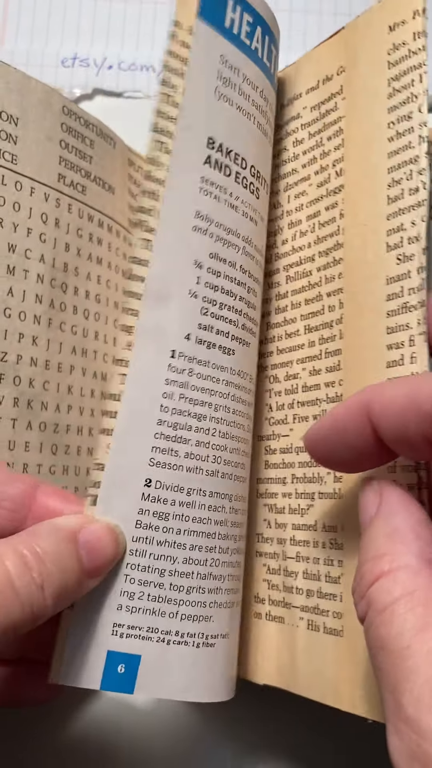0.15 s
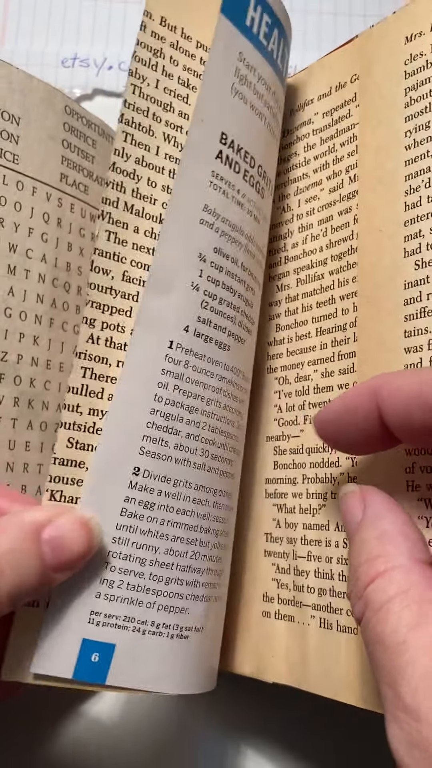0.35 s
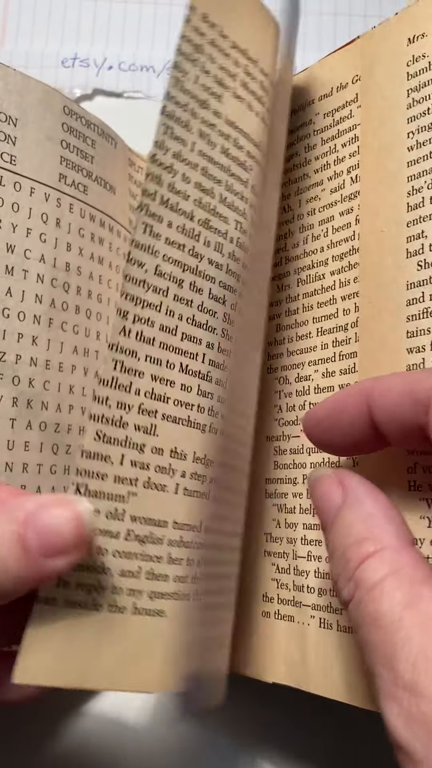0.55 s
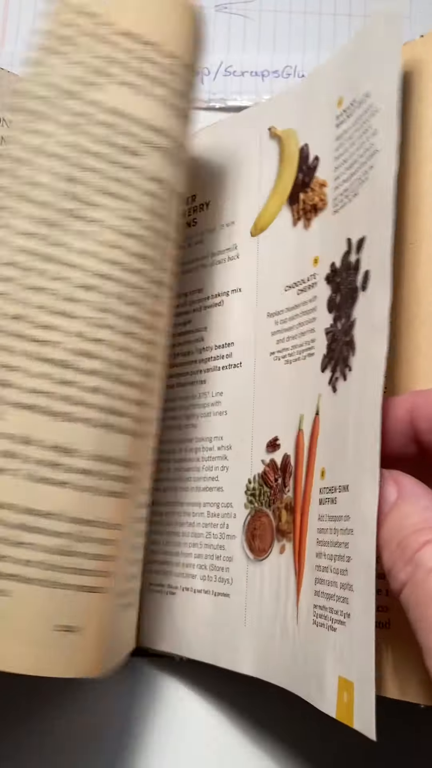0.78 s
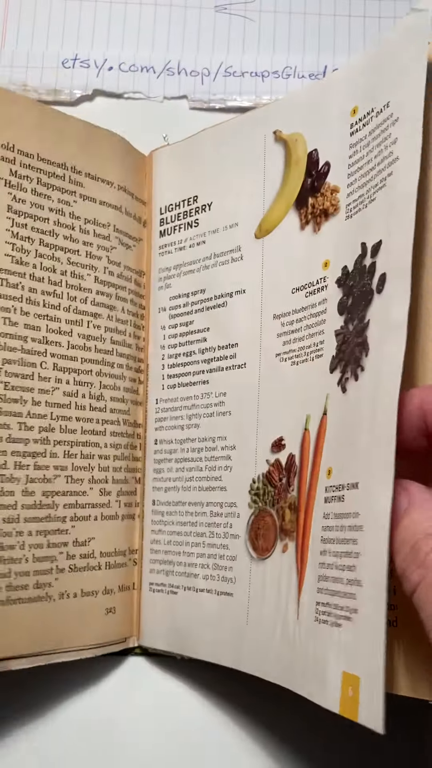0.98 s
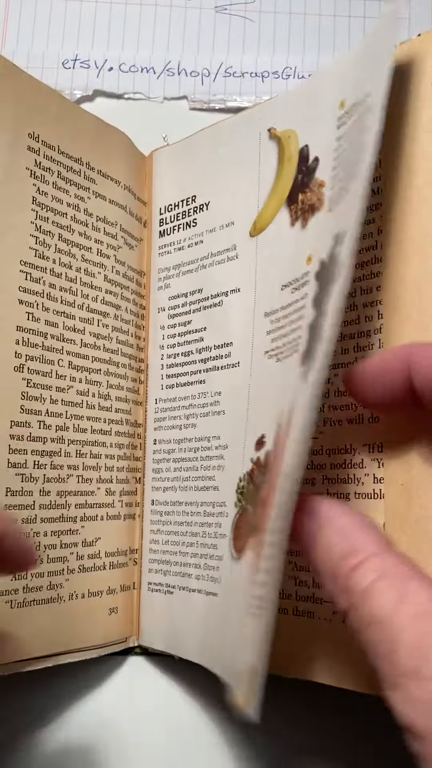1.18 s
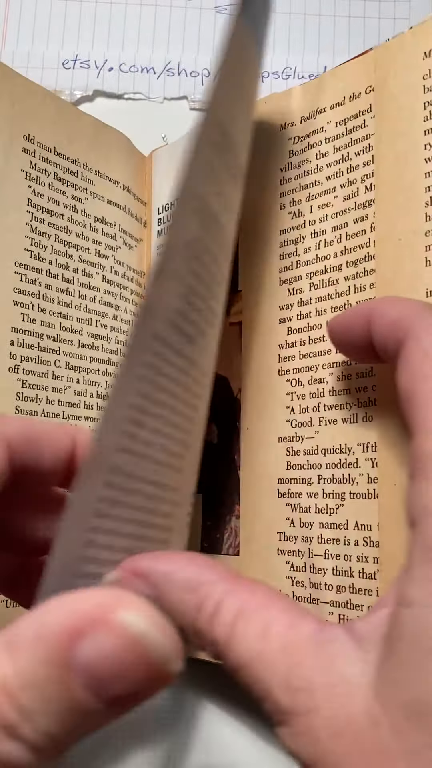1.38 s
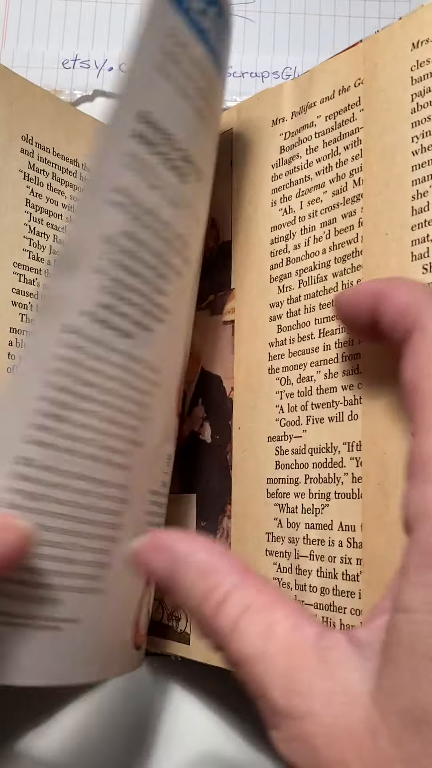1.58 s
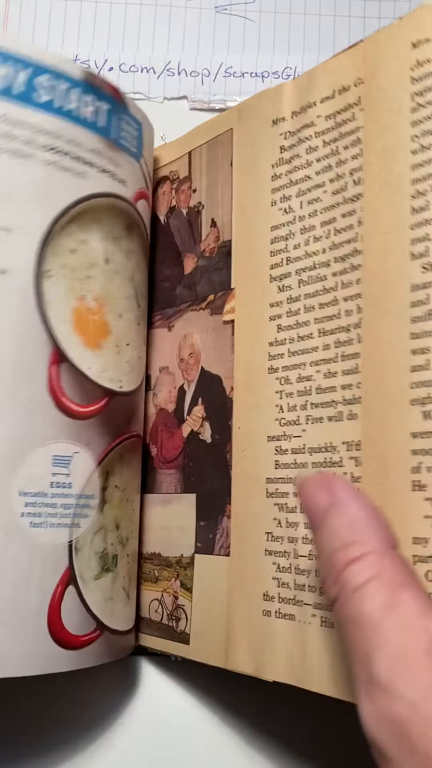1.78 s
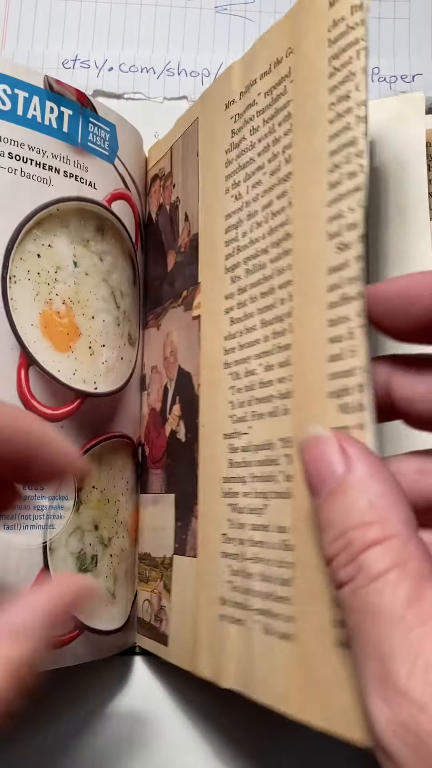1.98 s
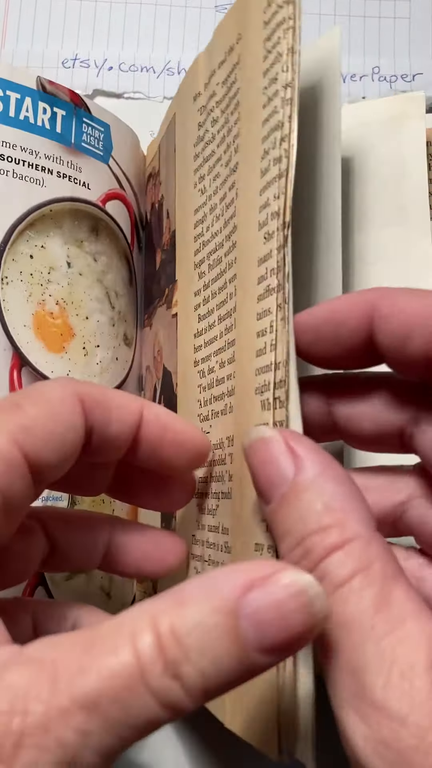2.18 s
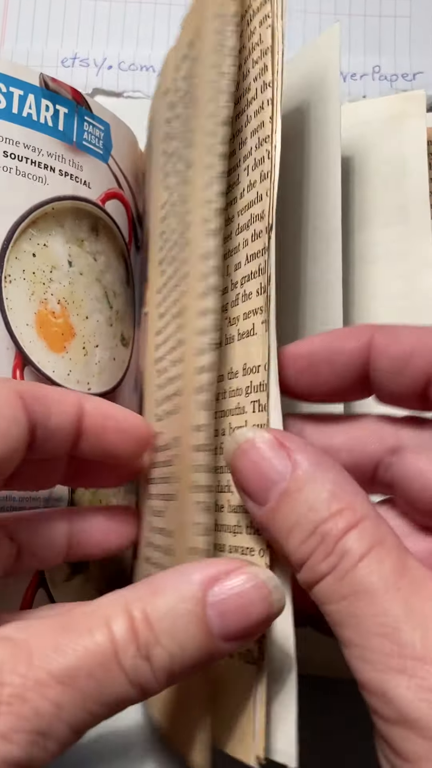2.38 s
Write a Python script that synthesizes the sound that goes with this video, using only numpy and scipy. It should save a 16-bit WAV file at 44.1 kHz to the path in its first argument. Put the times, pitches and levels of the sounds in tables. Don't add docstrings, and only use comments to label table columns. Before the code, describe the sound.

Dry book pages slide, scrape and flick in irregular bursts, with bright crease ticks, small hollow pops and faint puffs as sheets land, heard very close indoors with a short dull room tail.

```python
import sys
import numpy as np
from scipy import signal
from scipy.fft import rfft, irfft
from scipy.io import wavfile
from scipy.ndimage import uniform_filter1d

SR = 44100
rng = np.random.default_rng(int(sys.argv[2]) if len(sys.argv) > 2 else 0)


def makeup_ratio(level_db):
    decades = np.asarray(level_db, float) / 20
    return 10 ** decades


def unload_audio(sound):
    columns = np.transpose(np.atleast_2d(sound))
    steps = np.round(np.clip(columns, -1, 1) * 32767)
    wavfile.write(sys.argv[1], SR, steps.astype(np.int16))


N = 110250

# f/Hz, level/dB
PAPER_HISS = [(250, -29), (800, -26), (2500, -7.5), (4000, -5.5), (7500, -0.5), (10500, -6.5), (13000, -10),
              (16000, -19.5)]
BURST = 4096


def read(points, hz):
    f, value = np.transpose(points)
    return np.interp(np.log(hz + 1), np.log(f + 1), value)


def evened(x):
    return x / np.sqrt(np.mean(x ** 2) + 1e-20)


def colour(x, gain):
    size = x.shape[-1]
    return irfft(rfft(x) * gain(np.fft.rfftfreq(size, 1 / SR)), size)


def add(mix, s, sound):
    part = mix[round(s * SR):][:len(sound)]
    part += sound[:len(part)]


def resonate(x, hz, width_hz):
    turn = np.exp(2j * np.pi * np.cumsum(hz * np.ones(len(x))) / SR)
    r = np.exp(-np.pi * width_hz / SR)
    lowered = signal.lfilter([(1 - r) ** 2], [1, -2 * r, r * r], x / turn)
    return 2 * (turn * lowered).real


def micro_slips(spread_db, flicker_db, streak_db):
    slips_per_s = 12000
    flicker = evened(uniform_filter1d(rng.standard_normal(N), size=130))
    slips = rng.standard_normal(N) * (rng.random(N) < slips_per_s / SR)
    slips *= makeup_ratio(spread_db * np.minimum(rng.exponential(1, N), 4) + flicker_db * flicker)
    _, _, z = signal.stft(slips, SR, nperseg=256, noverlap=192)
    streaks = uniform_filter1d(rng.standard_normal(z.shape), size=45, axis=1)
    streaks = uniform_filter1d(streaks, size=4, axis=0)
    return signal.istft(z * makeup_ratio(streak_db * evened(streaks)), SR, nperseg=256, noverlap=192)[1][:N]


def hollow_ring(slips):
    # t/s, f/Hz
    hollow = [
        (.6, 1317),
        (1.3, 1850),
        (1.551, 1360),
        (1.8, 1784),
        (2.3, 1630),
    ]
    return evened(resonate(slips, np.interp(np.arange(N) / SR, *np.transpose(hollow)), width_hz=900))


def pressure(strokes):
    rise_db, fall_db, edge_s = 17, 10, 0.0025
    t = np.arange(N) / SR
    start, peak, end, db, ring_db = np.transpose(strokes)[:, :, None]
    rising_db = rise_db * (t - peak) / (peak - start)
    falling_db = fall_db * (peak - t) / (end - peak)
    slope_db = np.where(t < peak, rising_db, falling_db)
    take_up = (t - start) / (edge_s + 0.14 * (peak - start))
    let_go = (end - t) / edge_s + .5
    touch = np.clip(np.minimum(take_up, let_go), 0, 1) * makeup_ratio(db + slope_db)
    return touch.sum(0), (touch * makeup_ratio(ring_db)).sum(0)


def slide(strokes, spectrum, spread_db, flicker_db, streak_db):
    firm_db, thin_hz = -70, 4600
    slips = micro_slips(spread_db, flicker_db, streak_db)
    ring = hollow_ring(slips)
    hiss_gain, ring_gain = pressure(strokes)
    hiss = evened(colour(slips, lambda f: makeup_ratio(read(spectrum, f))))
    body = colour(hiss, lambda f: 1 / (1 + (f / thin_hz) ** 6))
    firm = np.minimum(hiss_gain / makeup_ratio(firm_db), 1)
    return makeup_ratio(6) * hiss_gain * (hiss - (1 - firm) * body) + makeup_ratio(3.5) * ring_gain * ring


def glides():
    # start/s, peak/s, end/s, level/dB, hollow ring over hiss/dB
    glide_strokes = [(-.03, -.01, .045, -69.5, -0.5), (.05, .12, 0.11, -69, -7), (.5, .53, 0.68, -68, 2.5),
                     (.555, .567, 0.59, -61, 0), (.6, .79, 0.83, -65.5, -14), (.79, .92, 1, -57, -8),
                     (.96, 1.0, 1.057, -60.5, -13), (1.03, 1.06, 1.13, -69.5, -7),
                     (1.205, 1.29, 1.34, -57.5, -4.5), (1.36, 1.385, 1.453, -70.5, 1),
                     (1.466, 1.53, 1.61, -56, -9), (1.582, 1.602, 1.614, -54.5, 3),
                     (1.61, 1.62, 1.47, -76.5, 0.1), (1.675, 1.72, 1.82, -57, -1.5),
                     (1.8, 1.835, 1.848, -67.5, -16), (1.83, 1.85, 1.89, -71.5, -2),
                     (1.99, 2.0, 2.074, -67.5, -6.5), (2.02, 2.08, 2.125, -72.5, -30),
                     (2.152, 2.165, 2.18, -68.5, -3), (2.19, 2.215, 2.25, -73, -6),
                     (2.4, 2.47, 2.56, -68, -4.5), (2.245, 2.272, 2.23, -67, 0)]
    # f/Hz, level/dB
    glide_hiss = [(300, -31), (900, -46), (2500, 0.5), (5000, 0), (7000, -1.5), (8500, 1), (10500, -1.5),
                  (15500, -6.5)]
    return slide(glide_strokes, glide_hiss, spread_db=3.0, flicker_db=0.5, streak_db=3.0)


def scrapes():
    # start/s, peak/s, end/s, level/dB, hollow ring over hiss/dB
    scrape_strokes = [(.135, .2, 0.3, -62, 3.5), (.2, .217, 0.27, -39.5, -10), (.25, .272, 0.29, -44, -8.5),
                      (.28, .3, 0.4, -66, -2), (.342, .354, 0.364, -50.5, 5), (.372, .38, 0.45, -75.5, 4.5),
                      (.84, .865, 0.89, -50, -5.5), (1.313, 1.32, 1.352, -49.5, 2),
                      (.365, .369, 0.37, -41.5, -5.5), (1.009, 1.012, 1.02, -51.5, -10),
                      (1.94, 1.98, 2.0, -57, -6.3), (1.335, 1.349, 1.344, -44, 4),
                      (1.345, 1.356, 1.378, -62, 9), (1.897, 1.901, 1.949, -52.5, -5),
                      (1.915, 1.95, 1.983, -52.5, -5.5), (2.325, 2.355, 2.424, -65, -34)]
    return slide(scrape_strokes, PAPER_HISS, spread_db=2.5, flicker_db=0.16, streak_db=2.5)


def ticks():
    # t/s, level/dB, brightness/dB per octave, t60/s
    creases = [(0.0094, -55.5, -8, 0.06), (0.0223, -46, -1.5, 0.016), (0.0953, -61, -9, 0.045),
               (0.3106, -38, -3.5, 0.021), (0.3661, -30.5, 0.3, 0.028), (0.5667, -43, -1.5, 0.025),
               (1.0095, -41.5, -5, 0.056), (1.1085, -51, -7.5, 0.017), (1.155, -58.5, -4, 0.057),
               (1.2925, -47, -1.5, 0.067), (1.3147, -34.5, -1.5, 0.079), (1.321, -32, 10, 0.025),
               (1.3318, -33.5, -1.5, 0.026), (1.3499, -34, -4.5, 0.045), (1.3885, -39.5, -2.5, 0.023),
               (1.5808, -37.5, -2.5, 0.014), (1.8993, -37, -4.5, 0.0092), (2.1657, -54, 2, 0.012),
               (2.1999, -43, -1.5, 0.01), (2.3451, -51, 1, 0.023), (0.504, -55, -5, .02),
               (0.5497, -47.5, -4, 0.022), (.7003, -55, -13.5, 0.027), (0.7968, -40.5, -12, 0.014),
               (0.8732, -48.5, 8, 0.018), (0.8868, -42, 17, 0.014), (1.343, -31, -7, 0.012),
               (1.4722, -57, -3, 0.022), (1.6888, -56, -4, 0.023), (1.716, -36, -12, 0.025),
               (1.8033, -58, -6, 0.014), (1.9365, -38.5, -5, .015), (2.228, -68, 7, 0.027),
               (0.2127, -28.5, 3, 0.011), (0.231, -24, 2, 0.01)]
    out, t = np.zeros(N), np.arange(BURST) / SR
    for s, db, bright_db, t60 in creases:
        def gain(hz):
            tilt_db = bright_db * np.log2(np.maximum(hz, 1500) / 6500)
            return makeup_ratio(0.66 * read(PAPER_HISS, hz) + tilt_db)

        crack = evened(colour(rng.standard_normal(BURST), gain))
        front = np.minimum(t / 0.00019, 1) * (1 + 2 * np.exp(-t / 0.0012))
        add(out, s, crack * front * makeup_ratio(db - 8.0 - 60 * t / max(t60, .004)))
    return out


def pops():
    # t/s, level/dB, ring f/Hz, t60/s
    buckles = [(0.023, -63, 1190, 0.024), (0.311, -46.5, 1030, 0.014), (0.366, -34.5, 1140, 0.012),
               (0.3665, -36, 650, 0.015), (.797, -62, 790, 0.024), (2.271, -61, 1410, 0.046),
               (0.508, -53, 1095, 0.033), (0.549, -47.5, 970, 0.01), (0.702, -61.5, 1160, 0.083),
               (0.798, -43, 1414, 0.036), (0.843, -48, 1300, 0.039), (0.915, -45.5, 1215, 0.0064),
               (1.01, -52.5, 1570, 0.023), (1.11, -67.5, 2040, 0.015), (1.315, -52, 1980, 0.076),
               (1.3506, -37, 1740, 0.047), (1.39, -48.5, 1290, 0.026), (1.582, -44, 2050, 0.058),
               (1.606, -46, 1120, 0.016), (1.715, -29, 1700, 0.016), (1.721, -46, 1600, 0.04),
               (1.767, -49, 1870, 0.017), (1.804, -49, 1750, 0.011), (1.901, -50.5, 2010, 0.11),
               (2.198, -62.5, 1930, 0.015)]
    width_hz, rise_s = 302, 0.000511
    knock = 4.0
    out, t = np.zeros(N), np.arange(BURST) / SR
    for s, db, hz, t60 in buckles:
        shape = np.minimum(t / rise_s, 1) * makeup_ratio(-60 * t / max(t60, .004))
        blow = rng.standard_normal(BURST) * shape + knock * np.exp(-((t - rise_s) * 8 * hz) ** 2)
        ring = resonate(blow, hz, width_hz) + 0.17 * resonate(blow * shape, 2 * hz, hz)
        add(out, s, makeup_ratio(db + 3.0) * ring / abs(ring).max())
    return out


def thumps():
    # t/s, level/dB, first pitch f/Hz, length/s
    landings = [(0.308, -51.5, 610, 0.0095), (0.368, -38.5, 493, 0.0096), (0.372, -44, 148, 0.026),
                (0.5492, -47.5, 883, 0.0052), (1.011, -54, 488, 0.012), (1.018, -54, 130, 0.031),
                (1.323, -59, 556, 0.01), (1.39, -56.5, 595, 0.009), (1.582, -53, 595, 0.0106),
                (1.605, -55, 226, 0.024), (0.217, -60, 307, .02), (1.741, -59.5, 474, 0.0204),
                (1.782, -66, 253, 0.026)]
    sag, puff_noise = 1.045, 0.77
    out, t = np.zeros(N), np.arange(BURST) / SR
    for s, db, hz, length in landings:
        swoop = -np.sin(2 * np.pi * np.cumsum(hz * np.exp(-sag * t / length)) / SR)
        puff = evened(colour(rng.standard_normal(BURST), lambda f: (f / hz) / (1 + (f / hz) ** 4)))
        shape = np.minimum(6 * t / length, 1) * np.exp(-(t / length) ** 2)
        push = (swoop + puff_noise * puff) * shape
        add(out, s, makeup_ratio(db) * push / abs(push).max())
    return out


def snaps():
    return thumps() + colour(ticks() + pops(), lambda f: 1 / (1 + (370 / (f + 1)) ** 4))


def echoes(t60, size):
    taps = np.zeros(size)
    at = np.arange(0, size - 20, 20)
    taps[at + rng.integers(0, 20, len(at))] = rng.choice([-1., 1.], len(at))
    taps *= makeup_ratio(-60 * np.arange(size) / SR / t60)
    return taps / np.linalg.norm(taps)


def room_tail(paper):
    tail = signal.oaconvolve(paper, echoes(t60=0.08, size=16000))[:N]
    tail = colour(tail, lambda hz: 1 / (1 + (hz / 5900) ** 2))
    return makeup_ratio(-9) * np.roll(tail, 200)


def air():
    # f/Hz, level/dB
    air_hiss = [(25, -28.5), (60, 5.5), (110, -3.5), (250, -15), (600, -33), (2000, -20), (8000, -19.5),
                (16000, -24)]
    lumps = makeup_ratio(2.65 * evened(uniform_filter1d(rng.standard_normal(N), size=2500)))
    noise = colour(rng.standard_normal(N), lambda hz: makeup_ratio(read(air_hiss, hz)) * (hz > 15))
    return makeup_ratio(-71.5) * evened(noise) * lumps


def ports(x):
    # f/Hz, phase/rad
    lead = [(0, 0), (500, -.35), (1000, -1.3), (1400, -.4), (1700, .9), (3000, 1.5), (5400, np.pi),
            (14900, 4 * np.pi)]
    # f/Hz, level/dB
    shade = [(100, -2.5), (300, -3.5), (650, 1), (1100, -8), (1550, -9.5), (2000, -6.5), (3500, -4),
             (5000, 0)]
    # f/Hz, coherence/1
    likeness = [(100, .8), (300, .88), (700, .86), (1900, .9), (3200, .5), (4300, .72), (5400, .87),
                (8000, .9), (16000, .9)]

    def direct_gain(hz):
        phase = np.interp(hz, *np.transpose(lead))
        return read(likeness, hz) * makeup_ratio(read(shade, hz)) * np.exp(1j * phase)

    def scattered_gain(hz):
        return np.sqrt(1 - read(likeness, hz) ** 2) * makeup_ratio(read(shade, hz))

    z = signal.stft(x, nperseg=256)[2]
    scattered = signal.istft(z * np.exp(2j * np.pi * rng.random(z.shape)), nperseg=256)[1][:N]
    scattered *= np.std(x) / np.std(scattered)
    left = colour(x, direct_gain) + colour(scattered, scattered_gain)
    return np.array([left, x])


def scene():
    paper = glides() + scrapes() + snaps()
    return ports(paper + room_tail(paper) + air())


def band_limit(x):
    return signal.sosfilt(signal.butter(12, 16500, fs=SR, output="sos"), x)


def record(dry):
    sum_and_difference = np.array([dry[0] + dry[1], dry[0] - dry[1]]) / 2
    hz, _, z = signal.stft(sum_and_difference, SR, nperseg=1024)
    power = uniform_filter1d(abs(z) ** 2, size=15, axis=1)
    power = uniform_filter1d(power, size=3, axis=2)
    keep = (power > makeup_ratio(2 * -8.5) * power[::-1]) | (hz < 3000)[:, None]
    audible = power[0] > makeup_ratio(2 * -15) * power[0, np.argmax(hz > 8500)]
    keep[0] &= audible | ((hz < 2600) | (hz > 4700))[:, None]
    level_db = 10 * np.log10((abs(z[:, hz > 3000]) ** 2).sum((0, 1)) + 1e-20)
    jumps = abs(np.diff(level_db, prepend=level_db[0])) > 7
    kept = z * ((keep | jumps) & (hz < 15900)[:, None])
    mid, side = signal.istft(kept, SR, nperseg=1024)[1][:, :N]
    return band_limit(np.array([mid + side, mid - side]))


dry = scene()
out = record(dry)
unload_audio(out)
```